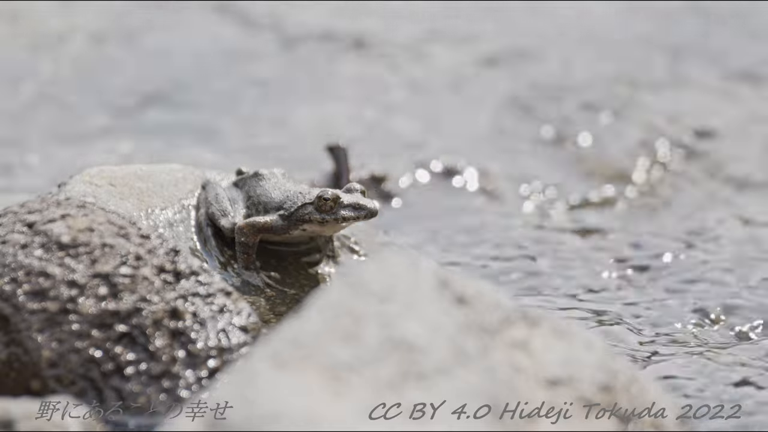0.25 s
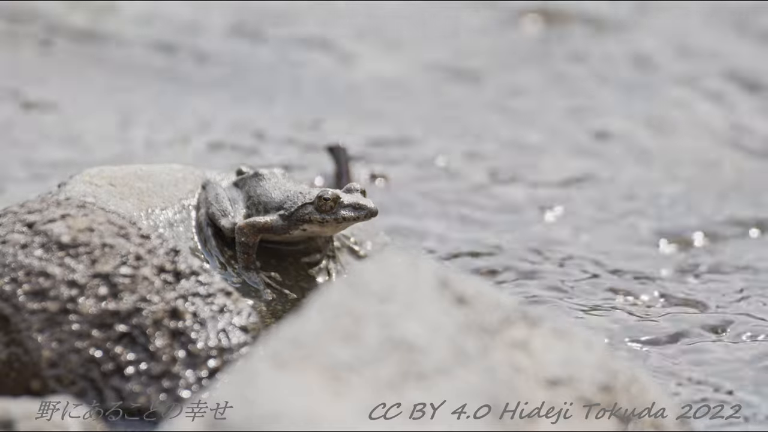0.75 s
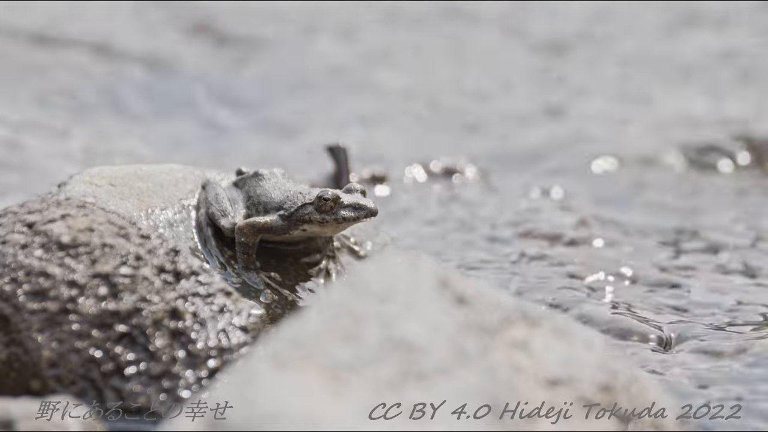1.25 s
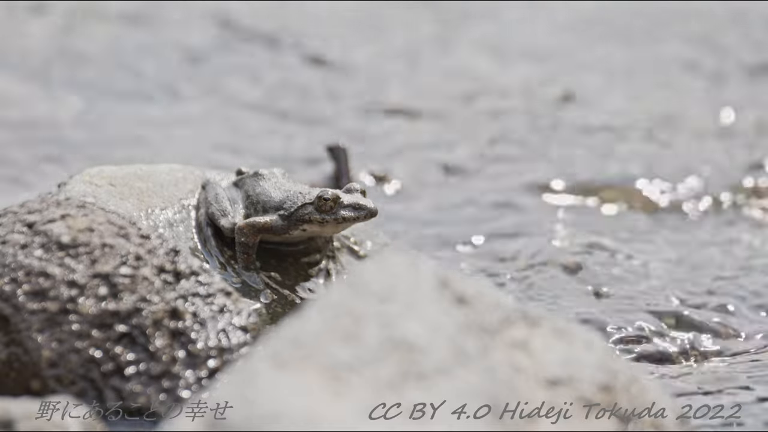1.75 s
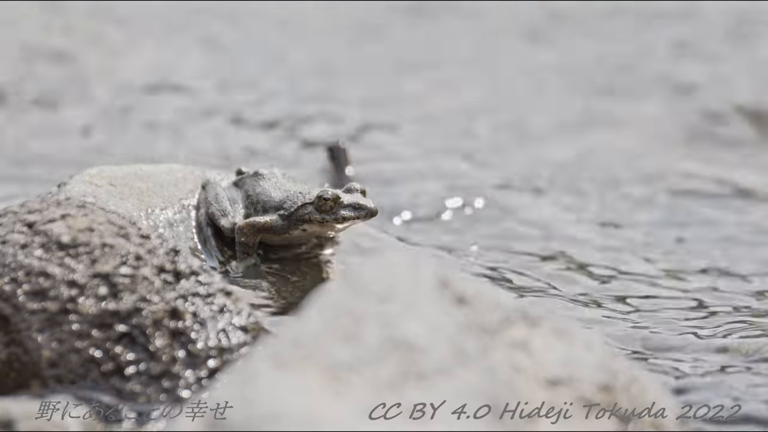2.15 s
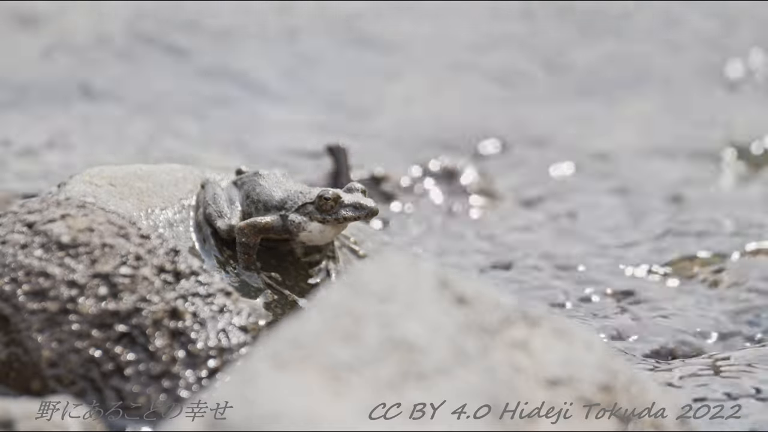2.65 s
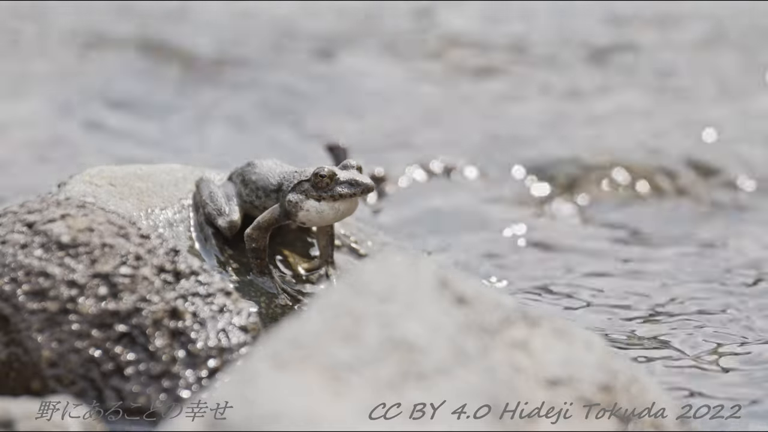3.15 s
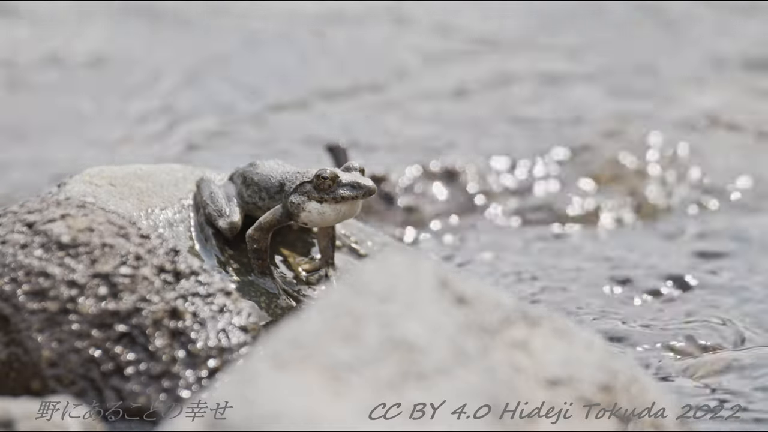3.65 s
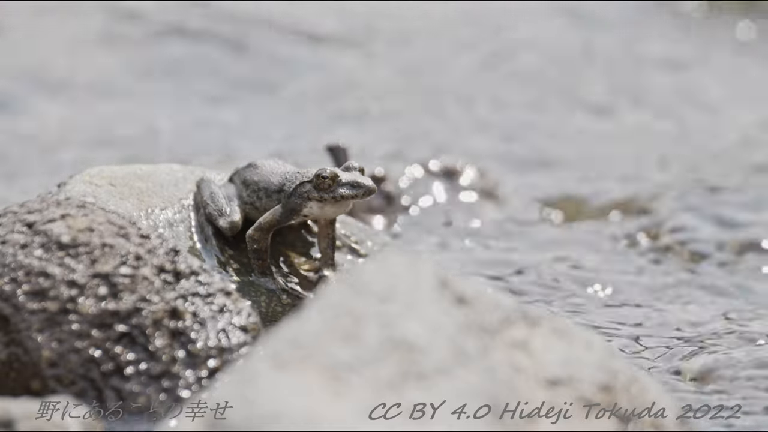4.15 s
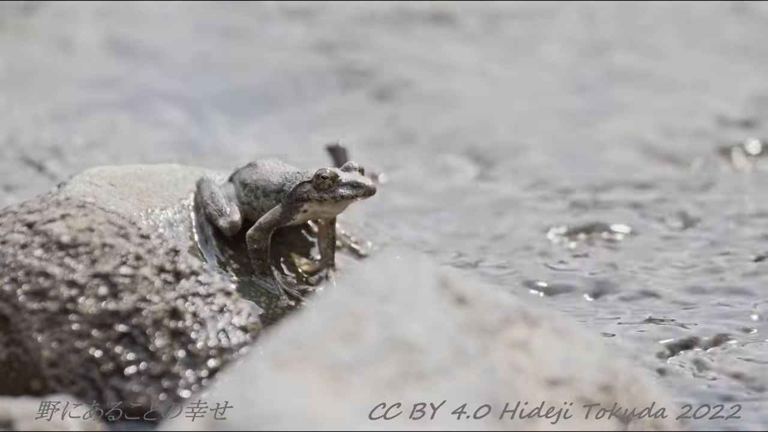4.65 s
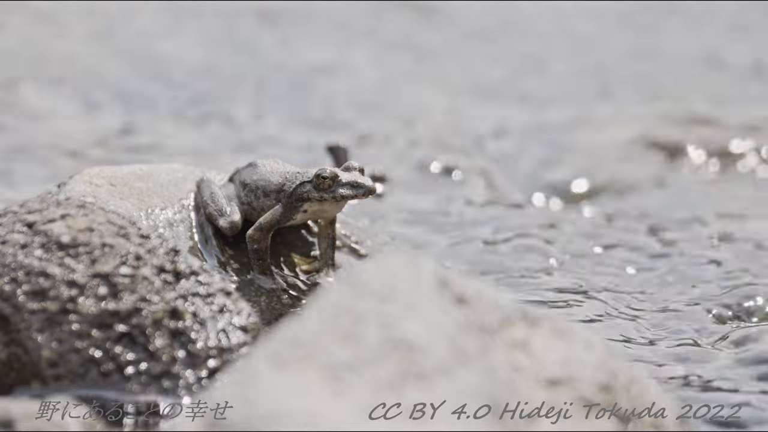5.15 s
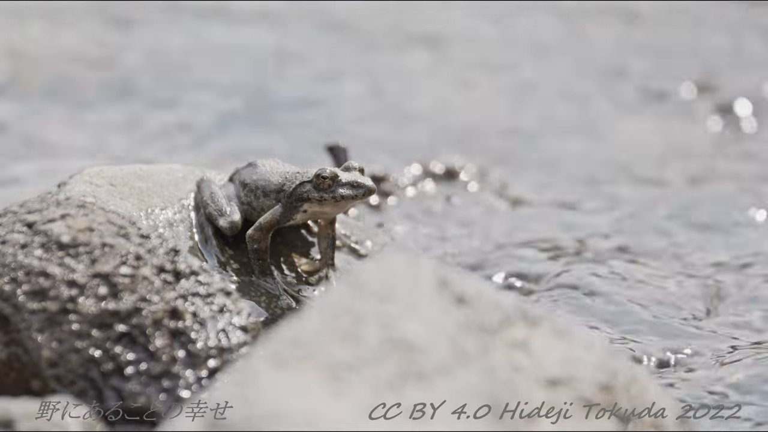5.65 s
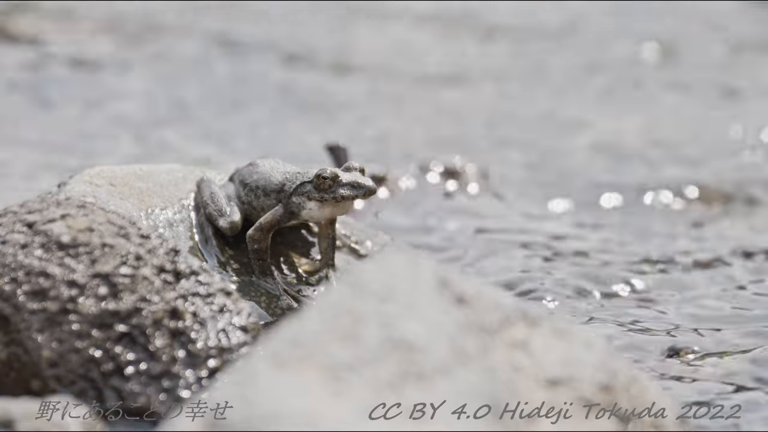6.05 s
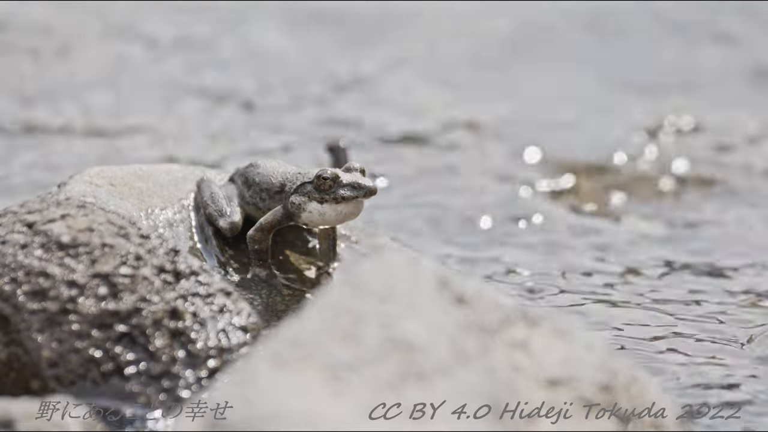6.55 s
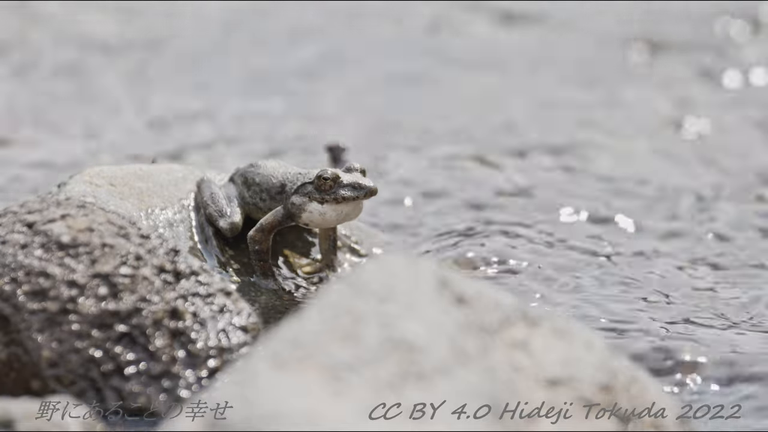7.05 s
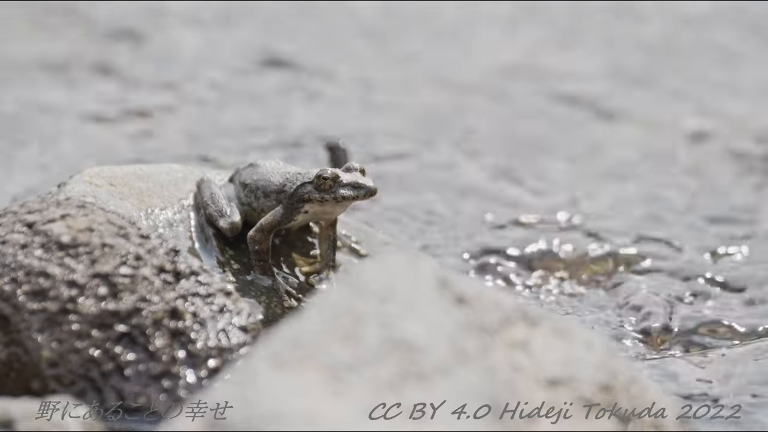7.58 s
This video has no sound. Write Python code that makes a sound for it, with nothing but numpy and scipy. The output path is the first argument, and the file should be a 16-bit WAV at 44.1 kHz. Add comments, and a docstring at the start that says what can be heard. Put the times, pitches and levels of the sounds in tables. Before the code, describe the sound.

A shallow stony stream rushes continuously, mid-bright and uneven, with small surges, fizzing bubbles, rounded plops and low soft glugs; plops cluster noticeably around 0.5-1.2 s and 4.6-5.9 s. From 0.8 to 2 s a far frog gives a faint run of about twenty quick whistled notes, near 2.4 kHz; another far run follows from 2.2 to 3.1 s, getting louder. At 2.9 s a near frog begins softly, about fourteen notes a second, each gliding up and snapping shut, rising from 1.9 to 2.2 kHz and swelling until it stops at 4.1 s. A brief far run answers to 4.3 s, ending in an upward sweep; a fainter one comes at 5.5-5.8 s. The near frog repeats its swelling run from 6.2 to 7.15 s, then water alone continues to about 8 s. Very faint high insect buzz, low hum and hiss lie underneath. Single microphone, mono, slight stone echoes.

```python
"""A shallow stony stream, with frogs that whistle runs of short rising notes: far ones now and then, a near one twice.
The water is patchy noise for the rush and many damped, rising sines for bubbles that fizz, plop, glug and splash.
Insects buzz far off as narrow bands of noise, and a faint hum of steady tones beats in the bass.
Each frog note is a gliding tone with its octave and a brief fifth, echoed by nearby stones; two frog details,
a fifth at 2.998 s and an upward sweep at 4.305 s, are damped sines like the bubbles."""
import sys
import numpy as np
from scipy import signal
from scipy.fft import rfft, irfft, next_fast_len
from scipy.io import wavfile
from scipy.ndimage import uniform_filter1d, map_coordinates

SR = 44100
rng = np.random.default_rng(int(sys.argv[2]) if len(sys.argv) > 2 else 0)


def generate_wav(sig):
    """Save sig (samples, or channels by samples) to the path in sys.argv[1] as 16-bit PCM at SR."""
    pcm = np.round(np.clip(np.atleast_2d(sig).T, -1, 1) * 32767).astype(np.int16)
    wavfile.write(sys.argv[1], SR, pcm)


N = 344862


def amp(db):
    """Gain of a level in dB."""
    return 10 ** (np.asarray(db) / 20)


def unit(x):
    """x at rms 1."""
    return x / np.sqrt(np.mean(np.abs(x) ** 2) + 1e-20)


def curves(rows, t):
    """Each column after the time, read at times t."""
    s, *columns = np.transpose(rows)
    return [np.interp(t, s, column) for column in columns]


def wobble(rate):
    """A smooth random curve, with rate random points a second."""
    points = rng.standard_normal(int(N * rate / SR) + 4)
    return map_coordinates(points, [np.arange(N) * rate / SR])


def filtered(x, response):
    """x times a response of frequency."""
    m = next_fast_len(N + 8192)
    return irfft(rfft(x, m) * response(np.fft.rfftfreq(m, 1 / SR)), m)[:N]


def coloured(x, points):
    """x through a spectrum of (Hz, dB) points, at rms 1."""
    f, db = np.transpose(points)
    return unit(filtered(x, lambda hz: amp(np.interp(np.log(hz + 1), np.log(f + 1), db))))


def bubbles(s, gain, hz, cycles, rise, size=SR // 50):
    """Damped sines that start softly and rise in pitch, as a bubble does when it nears the surface."""
    t = np.arange(size) / SR
    age = t * (hz / cycles)[:, None]  # time in units of the bubble's life
    swell = (1 - np.exp(-5 * age)) ** 2 * np.exp(-age) * (1 - t / t[-1])
    swell /= swell.max(axis=1)[:, None]
    glide = 1 + np.reshape(rise, (-1, 1)) * age  # acts on the phase, so the pitch rises twice as much
    ring = swell * np.sin(2 * np.pi * hz[:, None] * t * glide)
    at = (s * SR).astype(int)[:, None] + np.arange(size)
    return np.bincount(at.ravel(), (gain[:, None] * ring).ravel(), N + SR)[:N]


def patchy_rush():
    """White noise whose patches of time and pitch are randomly louder or softer."""
    z = signal.stft(rng.standard_normal(N), nperseg=512)[2]
    field = uniform_filter1d(rng.standard_normal(z.shape), size=5, axis=0)  # smooth across pitch
    field = uniform_filter1d(field, size=6, axis=1)  # and across time
    return signal.istft(z * amp(2.76 * unit(field)), nperseg=512)[1][:N]


def clumped_times(chance, clumps):
    """Start times in seconds, crowded where the running total of activity climbs fast."""
    return np.interp(chance, clumps / clumps[-1], np.arange(N) / SR)


def fizz(clumps):
    """Thousands of bubbles over a wide range of pitch: many small, few large, none huge."""
    u = rng.random((5500, 4))
    hz = 220 * 30 ** u[:, 1]
    gain = amp(-3.5 * np.log(u[:, 2] + 0.16))
    cycles = 3 + 14 * u[:, 3] ** 2
    return bubbles(clumped_times(u[:, 0], clumps), gain * np.sqrt(1 / cycles), hz, cycles, rise=0.016)


def ticks(clumps):
    """Droplet ticks: bubbles that die within little more than one cycle."""
    u = rng.random((900, 3))
    hz = 1800 * 4 ** u[:, 1]
    gain = amp(-3 * np.log(u[:, 2] + 0.035))
    s = clumped_times(u[:, 0], clumps)
    return bubbles(s, gain, hz, np.full(len(u), 1.3), rise=0.008, size=SR // 200)


def babble(clumps):
    """Ringing bubbles with lives of 3-9 ms whatever their pitch."""
    u = rng.random((1600, 4))
    hz = 300 * 8 ** u[:, 1]
    gain = amp(-3 * np.log(u[:, 2] + .08))
    cycles = hz * (.003 + .006 * u[:, 3])
    return bubbles(clumped_times(u[:, 0], clumps), gain, hz, cycles, rise=.012, size=SR // 30)


def bright_droplets():
    """Very short, high bubbles scattered evenly at random."""
    u = rng.random((260, 3))
    hz = 5000 * 2.5 ** u[:, 1]
    gain = amp(-4 * np.log(u[:, 2] + .05))
    return bubbles(u[:, 0] * N / SR, gain, hz, np.full(len(u), 1.2), rise=.01, size=SR // 400)


BABBLE_DB, FIZZ_DB, TICK_DB = -10.5, -10.5, -14.5  # beside the rush, before the stream is coloured
SPRAY_DB = -79  # level of the bright droplets
RUSH_DB, GURGLE_DB, SURGE_DB = 2, -65, 0.67  # added to the rush and treble; low gurgle; random swells

# How the stream's strength changes. Each row: time in seconds, level of the rush in dB before RUSH_DB
# is added, level of the treble compared with the rush in dB.
STREAM_FLOW = [(0.0, -52.5, -2.5), (0.69, -51.5, -5), (0.85, -50, -6.5), (1.04, -52, -2), (1.24, -50.5, -4),
               (1.37, -49.5, -6), (1.91, -50, -6.5), (2.2, -51.5, -6.5), (2.68, -48.5, -3.5),
               (2.92, -48.5, -7), (3.07, -53, -1.5), (3.31, -52, -5.5), (3.44, -53.5, -1.5),
               (3.74, -48.5, -5.5), (3.94, -49, -6.5), (4.38, -49.5, -6.5), (4.96, -50, -6.5),
               (6.18, -52, -4), (6.32, -48, -7), (6.84, -53.5, -4), (7.17, -51.5, -5.5), (7.82, -50, -6)]
# The stream's colour, before its three bands are set to their own levels.
# Each row: frequency in Hz, relative strength in dB.
WATER_COLOUR = [(60, -75), (200, -33.5), (400, -20.5), (650, -11.5), (880, -12.5), (1150, -3), (1900, 1.5),
                (2600, -7), (4250, -13.5), (4700, -20.5), (5200, -17), (5700, -29.5), (6600, -24),
                (12000, -46)]


def stream():
    """Rush and clumped bubbles share one colour; gurgle, rush and treble bands then surge separately."""
    clumps = np.cumsum(amp(4 * wobble(10)))  # splashes release bubbles in bunches
    mix = unit(patchy_rush()) + amp(BABBLE_DB) * unit(babble(clumps))
    mix += amp(FIZZ_DB) * unit(fizz(clumps)) + amp(TICK_DB) * unit(ticks(clumps))
    body = coloured(mix, WATER_COLOUR)
    gurgle = filtered(body, lambda f: 1 / (1 + (f / 900) ** 8))
    treble = filtered(body, lambda f: 1 - 1 / (1 + (f / 2500) ** 8))
    bands = gurgle, body - gurgle - treble, treble
    rush_db, treble_db = curves(STREAM_FLOW, np.arange(N) / SR)
    levels_db = GURGLE_DB, rush_db + RUSH_DB, rush_db + RUSH_DB + treble_db
    flow = sum(amp(db + SURGE_DB * wobble(5)) * unit(band) for db, band in zip(levels_db, bands))
    return flow + amp(SPRAY_DB) * unit(bright_droplets())


# The insect bands. Each row: start in seconds, stop in seconds, fade-in in seconds, fade-out in seconds,
# first pitch in Hz, last pitch in Hz, level in dB, width in Hz, pulses per second, pulse depth from 0 to 1.
INSECT_BANDS = [(2.65, 3.66, .5, .15, 6010, 6040, -64, 130, 24, .2),
                (0.3, 2.6, 1.2, .3, 6200, 6320, -65.5, 280, 28, 0),
                (2.0, 3.62, .4, .5, 6480, 6580, -64.5, 240, 28, 0),
                (-.3, 2.75, 1, .5, 6760, 7070, -63, 380, 66, .2),
                (-1, 3.0, 1, 1, 7200, 6600, -67, 1200, 66, 0),
                (-1, 3.7, .5, .8, 7450, 7780, -65.5, 520, 69, 0),
                (3.4, 9, .5, .5, 7720, 7730, -67, 520, 69, 0),
                (6.8, 9, .4, .5, 7760, 7700, -66, 520, 69, 0),
                (-.5, 3.5, 1, 1.2, 8120, 8350, -70.5, 360, 110, .1),
                (3.4, 9, .6, .5, 8450, 8360, -69.5, 360, 110, .1),
                (3.5, 9, .3, 3, 8950, 8800, -75, 300, 60, 0),
                (.5, 2.7, .4, .8, 9230, 9230, -82, 160, 60, 0),
                (3.6, 7.2, .4, .6, 9420, 9150, -81, 160, 60, 0)]


def insects():
    """Distant buzzing: narrow noise around a drifting centre, some of it lightly pulsed, fading in and out."""
    t, out = np.arange(N) / SR, np.zeros(N)
    for start, stop, fade_in, fade_out, hz, last_hz, db, width_hz, rate, depth in INSECT_BANDS:
        # two slow noises, placed on a cosine and a sine, make one band around the centre pitch
        a, b = (unit(filtered(v, lambda f: 1 / (1 + (2 * f / width_hz) ** 2)))
                for v in rng.standard_normal((2, N)))
        centre_hz = np.interp(t, [start, stop], [hz, last_hz]) + .05 * width_hz * wobble(6)
        phase = 2 * np.pi * np.cumsum(centre_hz) / SR
        pulse = 1 + depth * np.sin(2 * np.pi * rate * t + 1.8 * wobble(11.0))
        singing = np.clip((t - start) / fade_in, 0, 1) * np.clip((stop - t) / fade_out, 0, 1)
        level = amp(db + 0.53 * wobble(4.5) + 0.91 * wobble(25))
        out += singing * level * pulse * (a * np.cos(phase) + b * np.sin(phase))
    return out


# The hum's tones; the close pair beats. Each row: pitch in Hz, rms level in dB.
HUM_TONES = [(71.6, -98.5), (71.97, -97), (143.2, -99)]


def hum():
    """A faint low hum that swells and fades as two close tones drift in and out of step."""
    t = np.arange(N) / SR - .8  # all tones are in step at 0.8 s
    return sum(np.sqrt(2) * amp(db) * np.cos(2 * np.pi * hz * t) for hz, db in HUM_TONES)


# Bursts of small bubbles. Each row: middle in seconds, level of the loudest possible bubble in dB,
# spread to either side in seconds, lowest pitch in Hz, highest pitch in Hz.
SPLASH_BURSTS = [(.94, -45, 0.011, 2600, 5000), (2.497, -45, 0.004, 5460, 7300),
                 (.55, -48, 0.031, 1300, 2400), (.93, -39.5, 0.05, 1110, 2400),
                 (4.63, -42.5, 0.033, 1200, 2300), (4.85, -44.5, 0.052, 1100, 1900),
                 (5.28, -39, 0.038, 1200, 2430), (5.41, -47.5, 0.027, 700, 1500),
                 (5.58, -50, 0.028, 594, 1300), (5.86, -37, 0.055, 1400, 2200),
                 (.36, -50, 0.0044, 6000, 8500), (.6, -65, 0.0047, 6000, 8950),
                 (.814, -53, .003, 4500, 6000), (1.781, -60, .004, 6000, 8000),
                 (5.783, -52, .003, 4500, 6500), (5.879, -53, 0.0046, 5700, 6800),
                 (5.8925, -46, 0.0015, 4500, 12500), (7.365, -52, .004, 4200, 5200),
                 (6.983, -50, .008, 5500, 6400), (7.068, -50, 0.0076, 6550, 9000)]


def splashes():
    """Each splash scatters 24 short bubbles at random over its time and pitch range."""
    s, db, spread, low_hz, high_hz = np.repeat(SPLASH_BURSTS, 24, axis=0).T
    u = rng.random((len(s), 3))
    hz = low_hz * (high_hz / low_hz) ** u[:, 0]
    starts = s + spread * (2 * u[:, 1] - 1)
    return bubbles(starts, amp(db - 8.3 * u[:, 2]), hz, np.full(len(s), 3.0), rise=0.012)


# Slow upward glides: bubbles, and at 4.305 s the upward sweep that ends a far frog's run.
# Each row: start in seconds, peak level in dB, starting pitch in Hz, life in cycles,
# half the rise in pitch per life as a fraction.
UPWARD_GLIDES = [(.545, -54.5, 643, 8, .01), (1.072, -55, 702, 12, 0.011), (4.305, -44, 2360, 31, 0.053),
                 (.872, -53, 584, 7.9, 0.0086), (.93, -47, 678, 7, 0.05), (2.4, -56.5, 481, 11.4, 0.11),
                 (2.522, -51, 628, 9.8, 0.012), (5.385, -53.5, 578, 23, 0.22), (5.553, -57, 520, 15.4, .13),
                 (5.787, -50.5, 618, 18, 0.07), (5.92, -63, 220, 5.3, 0.11), (5.98, -64, 250, 4.3, .02),
                 (7.63, -61, 299, 11.5, 0.31)]


def glugs_and_frog_sweep():
    """Damped sines that ring for longer while the pitch glides up: glugging bubbles and one frog's sweep."""
    s, db, hz, cycles, rise = np.transpose(UPWARD_GLIDES)
    return bubbles(s, amp(db), hz, cycles, rise, size=SR // 16)


# Clear bubbles, and a short tone at 2.998 s that is the fifth of the near frog's note.
# Each row: start in seconds, peak level in dB, starting pitch in Hz, life in cycles.
CLEAR_TONES = [(0.547, -31, 1860, 3.3), (0.668, -27, 1204, 7.4), (0.68, -34, 1210, 6),
               (0.78, -28, 1710, 3.4), (.593, -33.5, 2120, 3), (.626, -38, 1880, 4), (.645, -36, 2000, 5),
               (.702, -41, 1140, 9), (.744, -40, 1205, 9), (0.786, -32.5, 1740, 8), (.793, -39, 1200, 4),
               (.801, -38, 1400, 5), (.871, -37, 1750, 4.5), (.959, -38, 1700, 5), (1.289, -48, 1010, 5.1),
               (1.428, -40.5, 1240, 7.9), (2.998, -39, 2880, 15), (4.076, -38, 2880, 11),
               (4.05, -46, 1730, 18), (0.912, -33.5, 1400, 5.1), (0.946, -34, 3200, 3.3),
               (0.922, -31, 1800, 2.6), (1.118, -32, 2300, 1.8), (1.2, -28, 2070, 2.5),
               (1.641, -41, 3170, 2.5), (2.313, -37, 3110, 2.5), (2.795, -38, 3260, 2.5),
               (3.215, -35, 2620, 2.5), (3.509, -40, 3220, 2.7), (3.854, -39, 3100, 5.3),
               (5.145, -37.5, 3500, 4.4), (6.081, -33, 2770, 2.5), (6.939, -35, 3900, 2.5),
               (7.131, -36, 3020, 6.2), (1.31, -33.5, 3305, 1.9), (1.823, -32.5, 1670, 7.9),
               (1.84, -35.5, 1320, 4.6), (2.492, -32.5, 1550, 3.6), (2.617, -27.5, 3080, 0.84),
               (2.901, -35, 1360, 3.9), (3.609, -33, 1610, 4), (3.919, -34, 1410, 8.6),
               (4.12, -29, 2630, 2.6), (4.31, -35, 1710, 8), (4.197, -37.5, 1250, 12),
               (4.636, -34, 1510, 1.9), (4.81, -38, 1520, 5.5), (4.891, -37.5, 2850, 2.4),
               (5.138, -28, 1520, 4.2), (5.188, -29.5, 1750, 2.1), (5.249, -29, 1610, 3.7),
               (5.421, -35, 2880, 5.9), (5.588, -36.5, 1130, 3.3), (5.789, -27, 2720, 1.5),
               (5.834, -33, 1620, 3), (5.858, -32.5, 1640, 3.6), (5.889, -33, 1730, 1.9),
               (6.179, -32, 2770, 2.1), (6.438, -34, 1550, 3.4), (7.035, -33, 2970, 2.7),
               (7.429, -34.5, 1270, 11), (7.689, -32, 2380, 3.2), (7.781, -30, 3250, 3.2)]


def plops_and_frog_fifth():
    """Damped sines whose pitch hardly rises: plopping bubbles and the fifth of a near frog's note."""
    s, db, hz, cycles = np.transpose(CLEAR_TONES)
    return bubbles(s, amp(db), hz, cycles, rise=0.0037)


FIRST_SWELL_MS, NOTE_SCATTER_DB = 12.2, .5  # every run starts with short notes; no two are equally loud
FAR_CLIMB_DB = 11  # extra climb in level while a far note swells
LEVEL_EASE = 1.6  # the level changes fast at first, then settles

# Runs of the far frogs: one, a second, then a brief run and a faint one. Each row: first peak in seconds,
# last peak in seconds, growth of the gap in ms per note, easing of that growth in ms per note,
# first level in dB, full level in dB, time to full level in seconds, first pitch in Hz, full pitch in Hz,
# pitch warm-up in seconds, full swell in ms.
FAR_RUNS = [(0.837, 1.998, 0.45, 0.035, -42, -37.5, 0.4, 2258, 2440, 0.272, 16.7),
            (2.174, 3.091, -0.32, -0.11, -43.5, -33.5, 0.88, 1976, 2300, 0.51, 16.8),
            (4.048, 4.3, 0.96, -0.041, -37, -38, .1, 2286, 2380, 0.2, 18.3),
            (5.544, 5.784, 0.0022, -0.018, -45, -41.5, 0.16, 2345, 2370, 0.09, 18.5)]
# How many notes each far run has, in the same order.
FAR_NOTE_COUNTS = (22, 16, 5, 5)


def far_notes():
    """Note rows for far runs: the pace shifts while the frog warms to its full level, pitch and length."""
    rows = []
    for run, count in zip(FAR_RUNS, FAR_NOTE_COUNTS):
        first, last, grow_ms, ease_ms, db, full_db, build, hz, full_hz, warm, ms = run
        k = np.arange(count)
        lag = (grow_ms * k ** 2 / 2 - ease_ms * k ** 3 / 6) / 1000  # seconds added to an even beat
        s = lag + np.linspace(first, last - lag[-1], count)
        short = np.clip(1 - (s - first) / build, 0, 1) ** LEVEL_EASE  # how far from the full level
        level_db = full_db + (db - full_db) * short + NOTE_SCATTER_DB * rng.standard_normal(count)
        cold = np.exp(-(s - first) / warm)
        pitch_hz = full_hz + (hz - full_hz) * cold
        swell_ms = ms + (FIRST_SWELL_MS - ms) * cold
        rows += zip(s, level_db, pitch_hz, swell_ms, np.full(count, FAR_CLIMB_DB))
    return rows


TAIL_SCATTER_DB = 1  # how the falling octave differs from note to note

# Shape of a note that swells for 22 ms; other swells stretch or squeeze the part before the peak.
# Each row: seconds from the peak, opening of the main tone in dB, octave in dB, pitch as a ratio.
NOTE_SHAPE = [(-.028, -21, -41.5, .83), (-.024, -8, -32, .875), (-.02, -4.5, -30, .91),
              (-.016, -0.8, -28, .932), (-.008, -0.6, -28.5, .963), (0, -0.2, -27, 1.003),
              (.0025, -4, -26, 1.03), (.0045, -8, -24.5, 0.97), (.007, -27.5, -18, 0.76),
              (.011, -46.5, -56, 0.48)]


def frog_note(t, hz, ms, climb_db, chance):
    """A note swells while its pitch climbs, then snaps shut as the octave drops; the throat sac rings on."""
    pace = np.where(t < 0, 22 / ms, 1)
    db, octave_db, ratio = uniform_filter1d(curves(NOTE_SHAPE, t * pace), size=40)
    ratio = 1 + (ratio - 1) / pace ** 1.087  # short notes climb less far
    held = np.maximum(ratio, .985 * (t > 0))  # the throat sac rings on at its own pitch
    flutter = [map_coordinates(c, [np.linspace(0, 15, len(t))]) for c in chance]
    turn = 2 * np.pi * hz * (1 + 0.006 * flutter[0]) / SR  # phase step per sample
    db += climb_db * np.minimum(t * pace / .022, 0)
    note = amp(db + 1.2 * flutter[1]) * np.sin(np.cumsum(turn * held))

    octave_db += TAIL_SCATTER_DB * chance[3, 0] * np.clip(t / 0.0025, 0, 1)
    low_db = .085 * max(2150 - hz, 0)  # low notes lie under the sac's resonance and leak more overtone
    overtone_db = octave_db + 0.59 * low_db + 0.9 * flutter[2] + 1.2 * chance[2, 0]
    note += amp(overtone_db) * np.sin(2 * np.cumsum(turn * ratio))

    # a fickle fifth as the note starts
    fifth_db = low_db / 2 - 6 - 400 * np.abs(t + .018 * (ms / 22) ** 3) + 4 * flutter[3]
    note += amp(octave_db + fifth_db) * np.sin(3 / 2 * np.cumsum(turn * ratio))
    return note * np.clip((t * pace + .036) / .008, 0, 1) * np.clip((t[-1] - t) / .003, 0, 1)  # fade ends


# The near frog's two runs, note by note. Each row: peak in seconds, level in dB, pitch in Hz, swell in ms,
# extra climb in level during the swell in dB.
NEAR_NOTES = [(2.944, -40, 1870, 13, 8), (3.008, -41, 1940, 16, 7), (3.071, -34, 2000, 13, 6),
              (3.132, -31.5, 2050, 16, 11), (3.185, -34.5, 2045, 5.3, 1), (3.197, -31, 2037, 4.1, 0),
              (3.263, -30, 2090, 21, 9), (3.327, -28.5, 2146, 23, 12), (3.392, -27, 2180, 21, 8),
              (3.462, -27, 2190, 17.4, 3.5), (3.532, -24, 2166, 23, 11), (3.599, -24, 2200, 23, 12.5),
              (3.668, -23.5, 2210, 18, 5.5), (3.736, -22.5, 2240, 18, 3.5), (3.807, -22, 2265, 20.6, 3.5),
              (3.881, -22, 2230, 21, 8.5), (3.955, -21, 2238, 20.6, 8.5), (4.027, -22.5, 2223, 19.6, 7),
              (4.101, -20, 2232, 19, 9), (6.158, -41, 1880, 14, 4), (6.214, -38.5, 1930, 16, 7),
              (6.273, -28.5, 2030, 16, 10), (6.332, -26, 2075, 13.3, 6.5), (6.393, -23.5, 2130, 21, 13),
              (6.457, -22.5, 2205, 20.5, 7), (6.523, -22.5, 2220, 20.6, 3.5),
              (6.591, -21.5, 2207, 23.5, 8.5), (6.657, -21, 2210, 23.4, 10), (6.725, -21.5, 2255, 23, 6),
              (6.792, -20.5, 2237, 26, 13), (6.865, -20.5, 2248, 26, 11), (6.934, -21, 2248, 22.4, 7.5),
              (7.006, -20, 2253, 21.5, 7), (7.077, -19.5, 2244, 25.6, 12), (7.152, -19.5, 2237, 20.5, 8)]
# Stones that answer the frogs. Each row: delay in seconds, level of the echo in dB.
STONE_ECHOES = [(.004, -35.5), (.013, -25.5), (.017, -34.5), (.022, -24), (.028, -27.5), (.036, -27)]


def frogs():
    """The far and near notes are whistled at their peak times, and nearby stones echo them all."""
    t = np.arange(-SR // 24, SR // 64) / SR  # seconds from the peak
    out = np.zeros(N)
    rows = far_notes() + NEAR_NOTES
    for (s, peak_db, hz, ms, climb_db), chance in zip(rows, rng.standard_normal((len(rows), 4, 16))):
        note = frog_note(t, hz, ms, climb_db, chance)
        out[round(s * SR) - SR // 24:][:len(t)] += amp(peak_db) * note
    return out + sum(amp(db) * np.roll(out, round(s * SR)) for s, db in STONE_ECHOES)


def scene():
    """Everything reaches one microphone."""
    water_and_tones = stream() + splashes() + glugs_and_frog_sweep() + plops_and_frog_fifth()
    # small bubbles move no bass
    without_bass = filtered(water_and_tones, lambda f: 1 - 1 / (1 + (f / 150) ** 4))
    return (without_bass + insects() + hum() + frogs())[None]


TOP_HZ = 15700  # nothing is kept from here up

# Colour of the steady hiss. Each row: frequency in Hz, relative strength in dB.
HISS_COLOUR = [(20, 10.5), (110, 7), (300, 9.5), (9000, -1.5), (10500, -7.5), (12500, -2.5), (15700, -21.5)]


def record(dry):
    """The microphone rolls off its treble steeply, hisses faintly, and nothing is kept above the band limit."""
    heard = filtered(dry[0], lambda hz: 1 / np.sqrt(1 + (hz / 9200) ** 16))
    hiss = amp(-81.0) * coloured(rng.standard_normal(N), HISS_COLOUR)
    return filtered(heard + hiss, lambda hz: hz < TOP_HZ)[None]


dry = scene()
out = record(dry)
generate_wav(out)
```